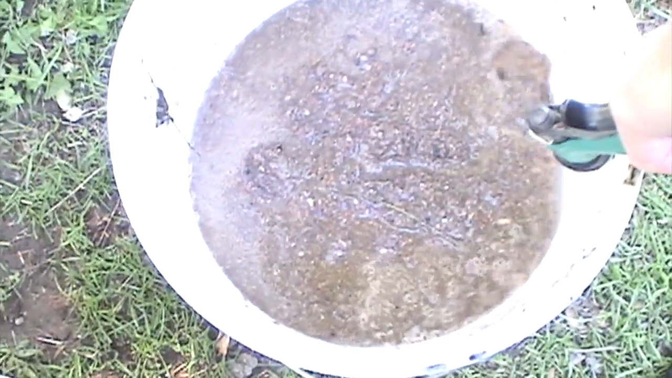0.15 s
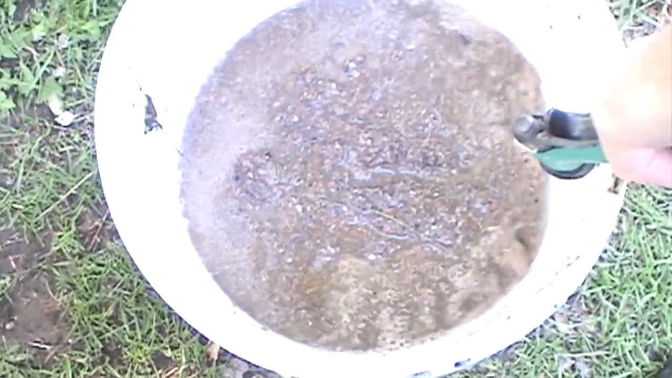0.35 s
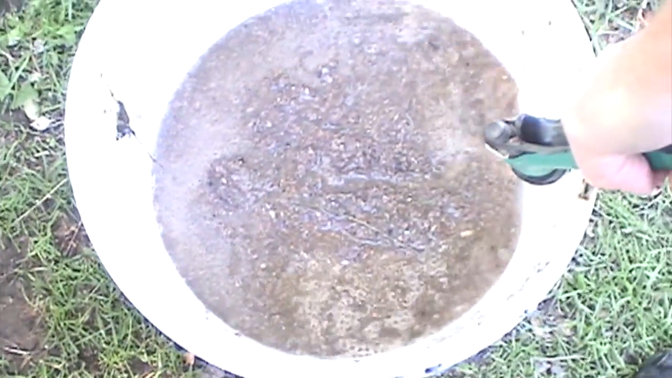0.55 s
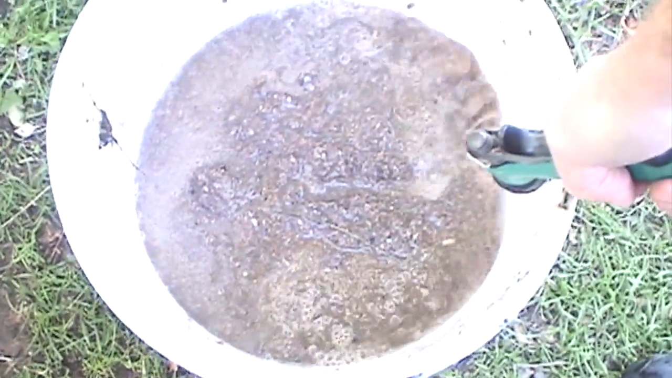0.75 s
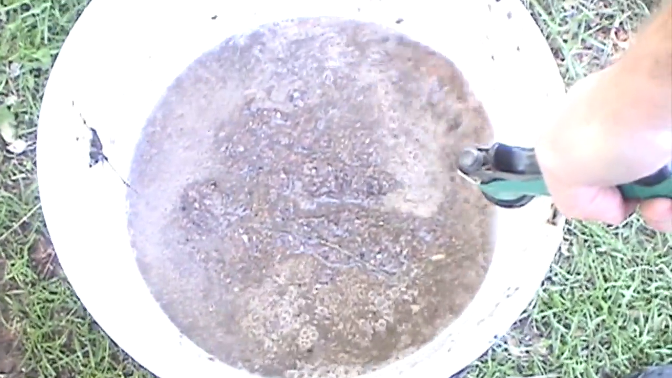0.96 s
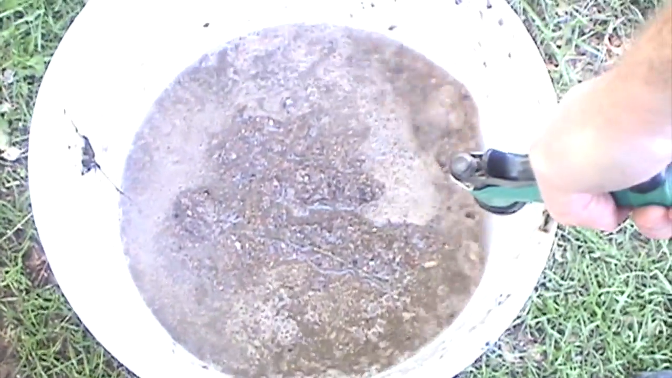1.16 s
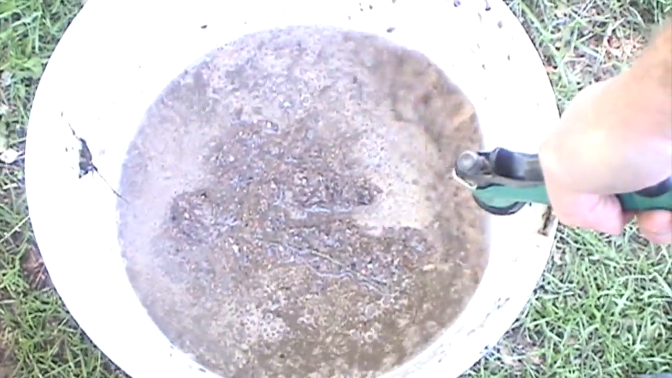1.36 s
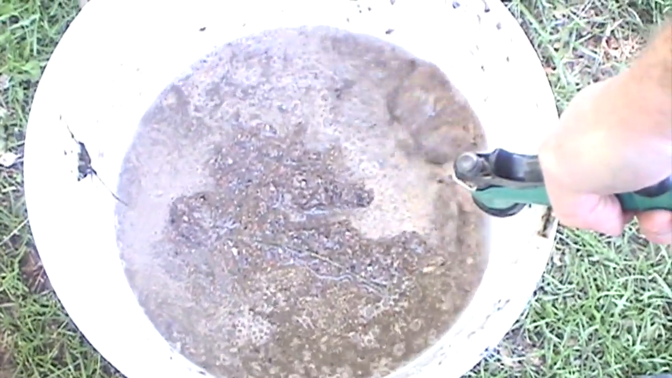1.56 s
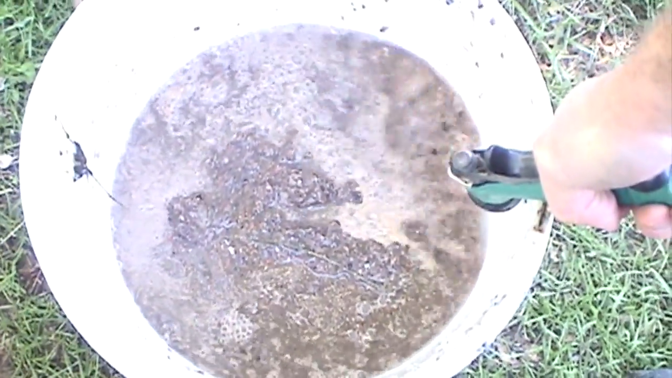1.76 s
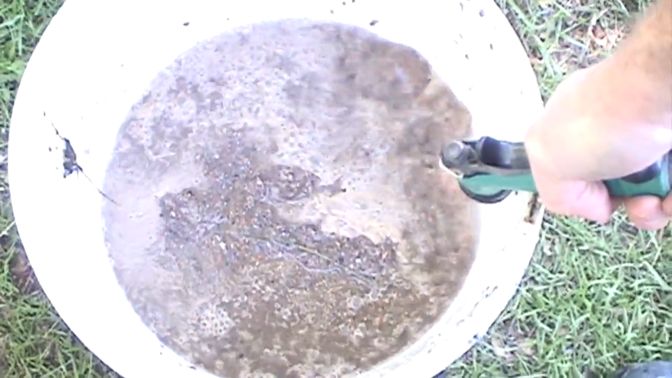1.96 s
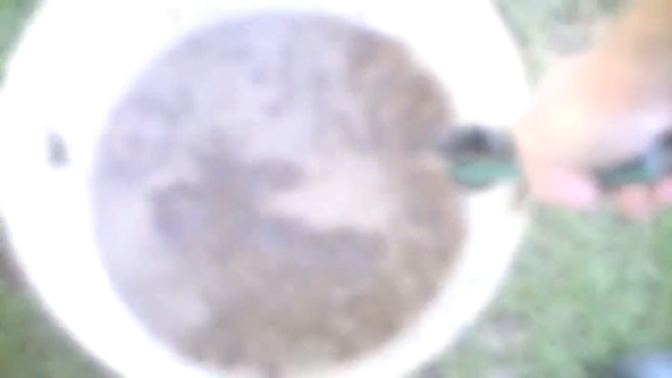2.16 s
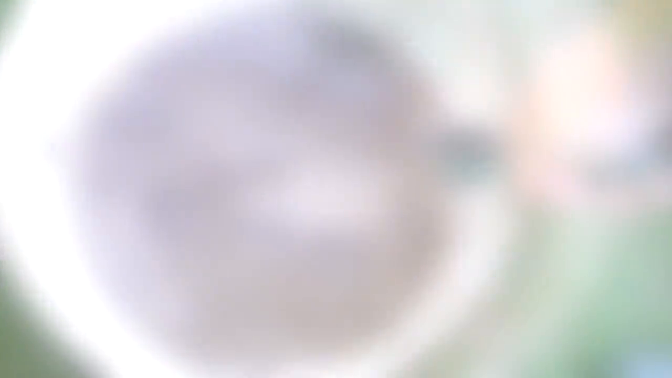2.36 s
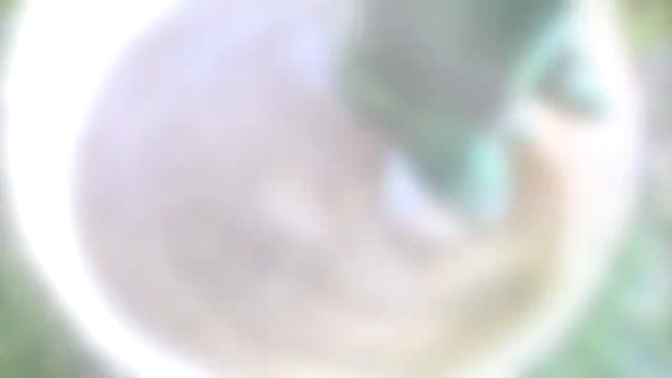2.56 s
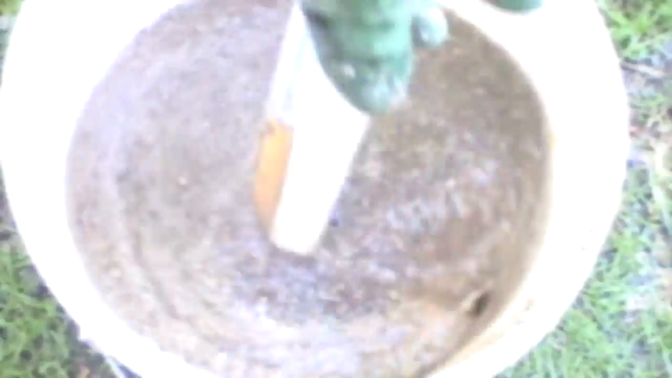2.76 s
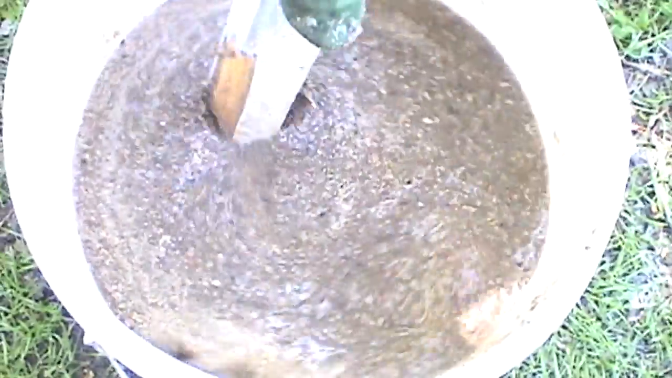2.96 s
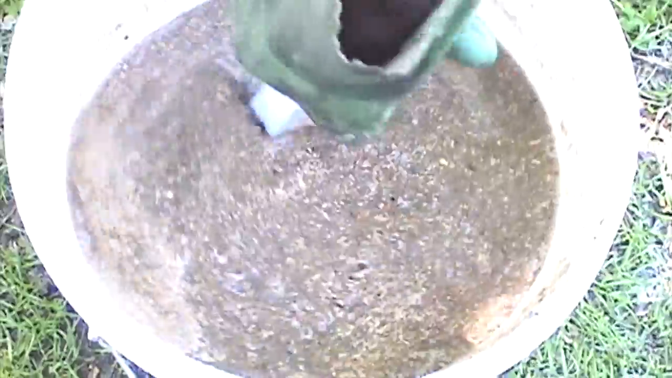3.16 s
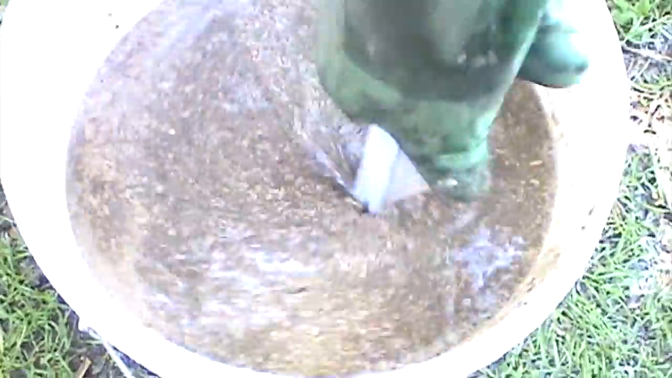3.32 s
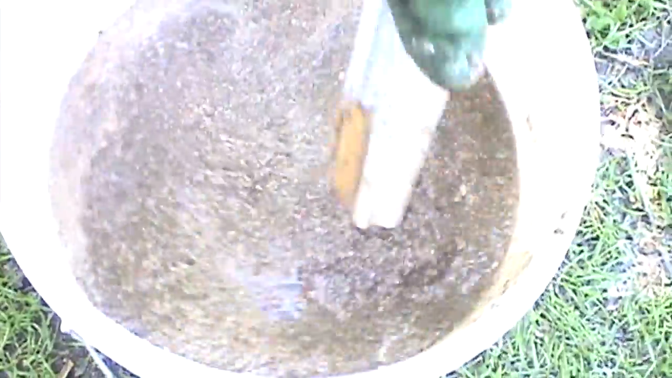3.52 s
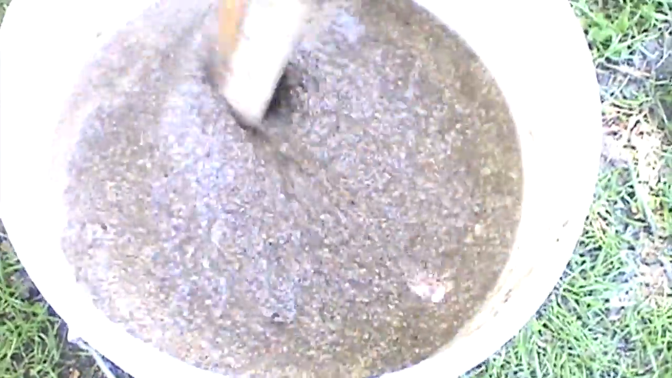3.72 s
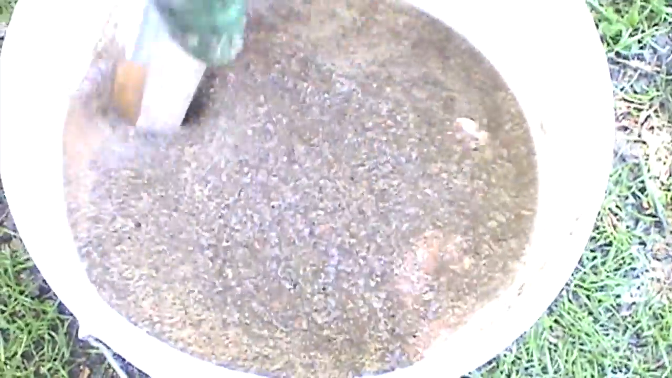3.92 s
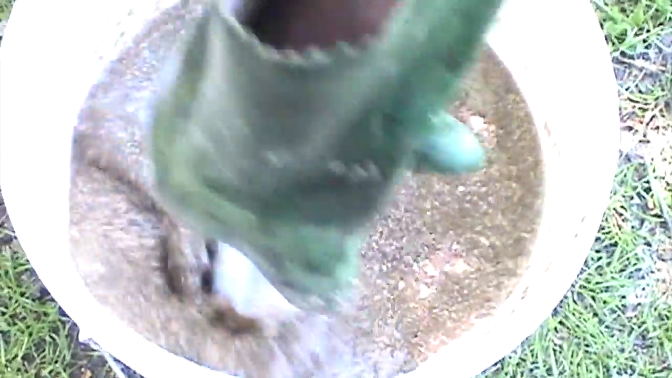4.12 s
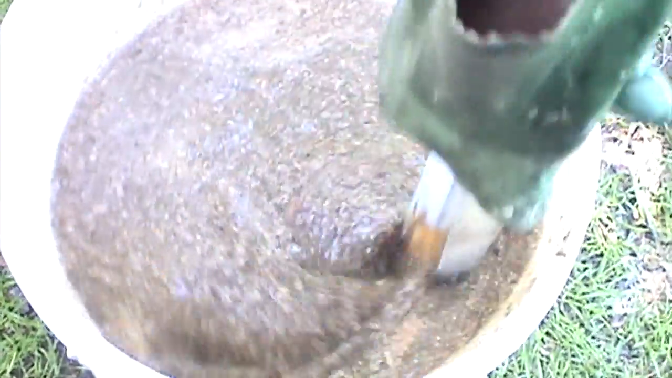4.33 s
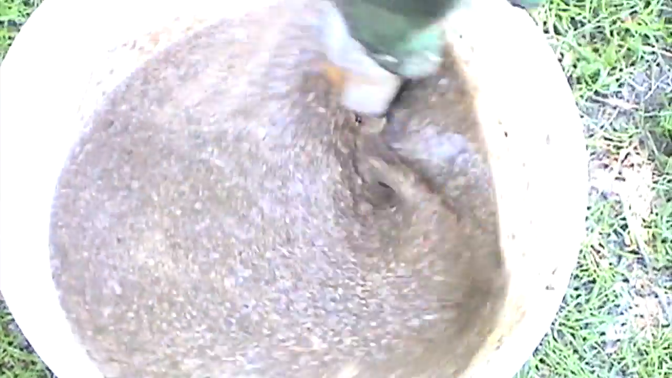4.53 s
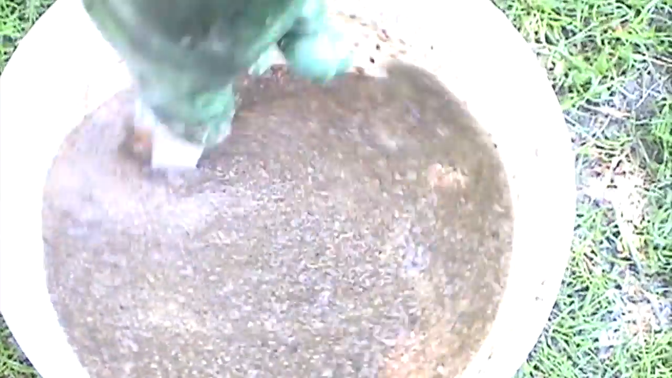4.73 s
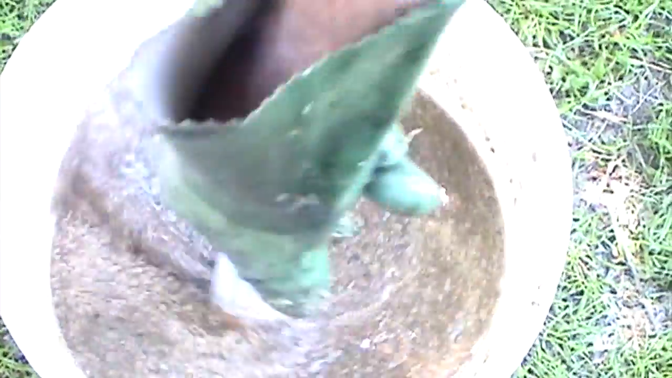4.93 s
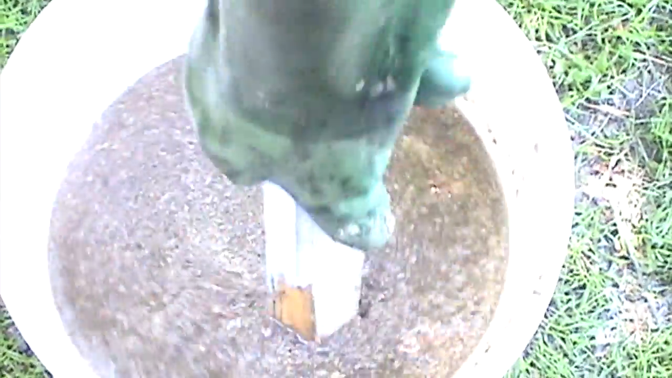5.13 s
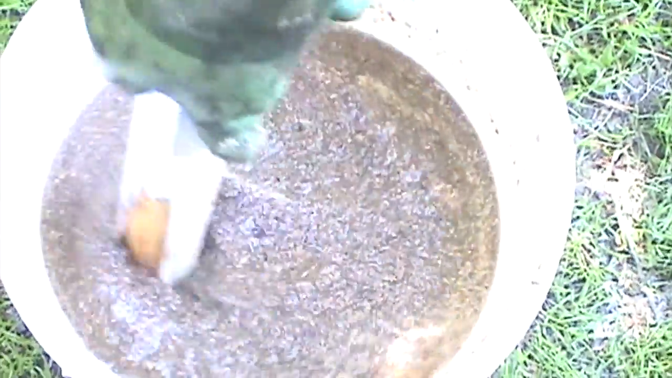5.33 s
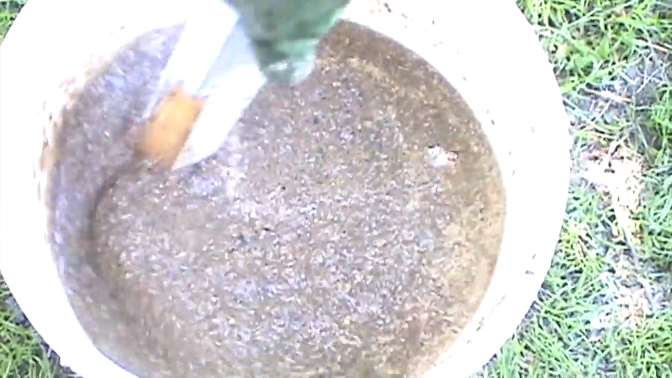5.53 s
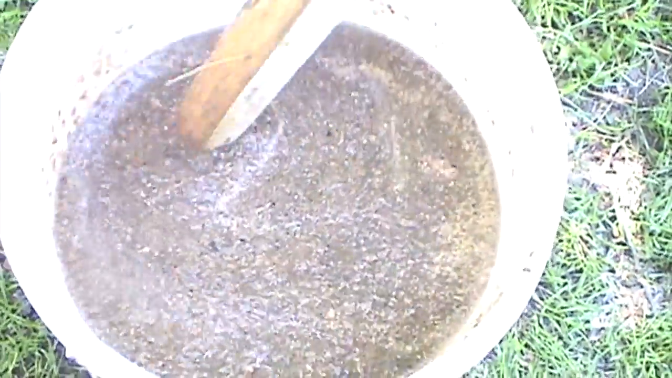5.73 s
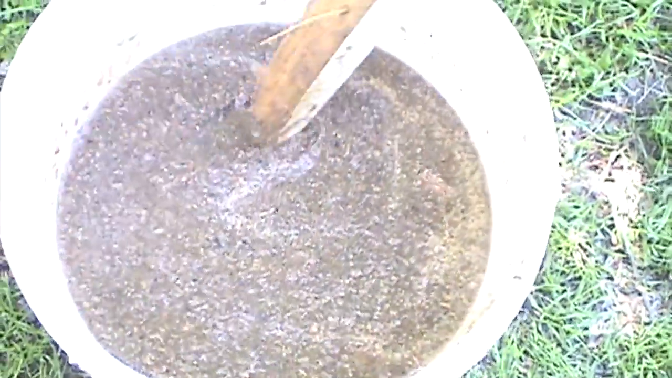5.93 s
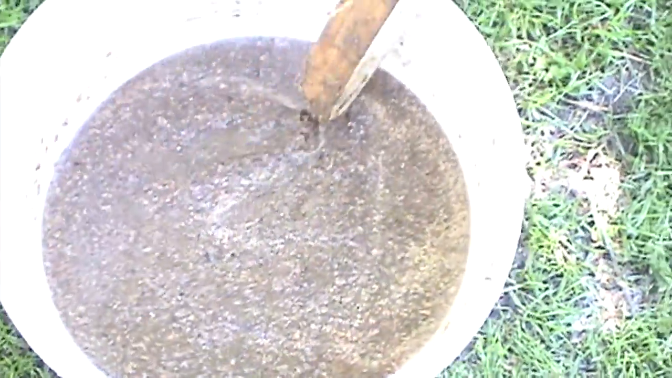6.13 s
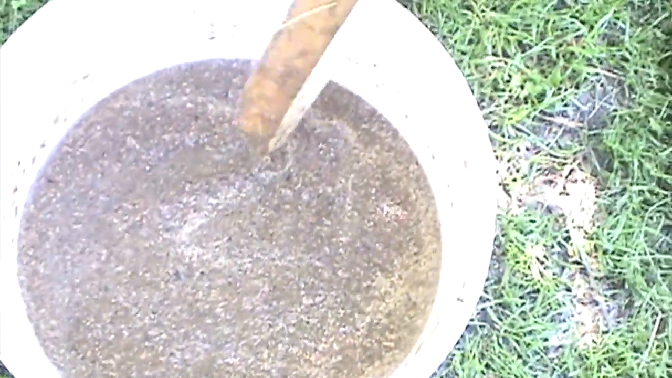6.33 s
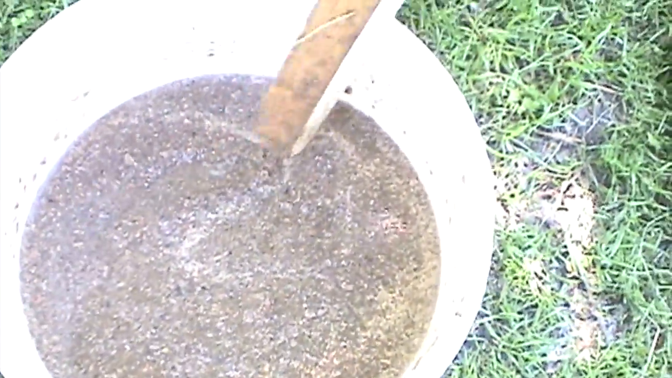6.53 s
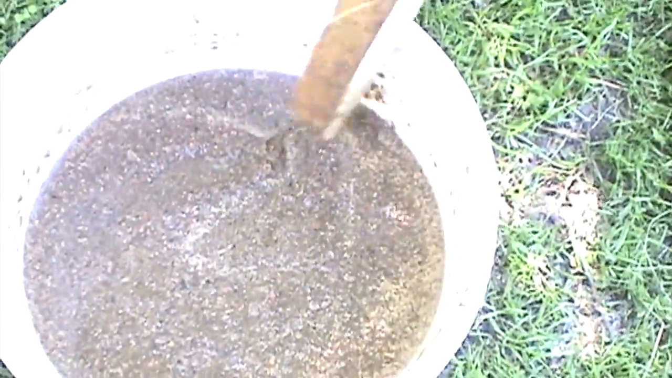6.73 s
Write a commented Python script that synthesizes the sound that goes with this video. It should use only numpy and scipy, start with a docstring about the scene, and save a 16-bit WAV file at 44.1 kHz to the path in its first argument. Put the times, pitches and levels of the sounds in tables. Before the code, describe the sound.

Water sprays and drums into a plastic bucket and stops; a stick stirs the wet mix and knocks three times on the wall.

```python
"""A hissing, drumming jet of water: a hose nozzle sprays into a plastic bucket of slurry on a lawn,
then is eased shut and dribbles out. Drops and bubbles make the hiss; the air in the bucket booms.
A wooden stick stirs the mix: it squelches, bumps the ringing wall and is finally knocked against it
three times. Small birds call some way off, and a faint electronic whine lies under everything."""
import sys
import numpy as np
from scipy import signal
from scipy.fft import rfft, irfft, next_fast_len
from scipy.io import wavfile

SR = 44100
rng = np.random.default_rng(int(sys.argv[2]) if len(sys.argv) > 2 else 0)


def to_wav(s):
    """Save 16-bit WAV."""
    ch = np.atleast_2d(s).T  # columns
    pcm = np.round(np.clip(ch, -1, 1) * 32767)  # PCM
    wavfile.write(sys.argv[1], SR, pcm.astype(np.int16))


N = 298998
TIME = np.arange(N) / SR


def spray():
    """The jet hisses and drums, dying away as the trigger is steadily let go."""
    closing_s, shut_s = 2.142, 2.946
    valve = np.interp(TIME, [closing_s, shut_s], [1, 0])
    return valve ** 1.295 * jet_hiss() + valve ** 1.24 * bucket_boom()


def jet_hiss():
    """Thousands of drops hit the slurry and echo off the bucket; gathering foam softens the hiss."""
    # tone of the drops: f/Hz, level/dB
    drop_colour = [(200, -43), (700, -16), (1100, -2.5), (1650, -4.5), (1900, -4.5), (2400, -1), (3400, -2),
                   (4300, 0), (5700, -1.5), (7000, -6.5), (8200, -2), (11300, -4), (13500, -12),
                   (15000, -16)]
    # reflections off the inside wall: delay/ms, gain
    wall_echoes = [(0.901, 0.28), (1.7, 0.095), (2.9, 0.12), (4.3, 0.22), (6.1, 0.14)]
    # upper resonances of the bucket and its air: f/Hz, width/Hz, level/dB
    hollow_modes = [(836, 94, 0.5), (1202, 224, 0), (1529, 59, 5.5), (1662, 26, 4.5), (2694, 360, -4),
                    (3784, 46, 4), (3860, 68, -2.5), (4450, 37, -11.5), (4900, 20, -29), (5040, 75, -0.5),
                    (5270, 30, -2), (5680, 43, 0), (7660, 270, -13)]
    impacts = grains(per_s=14000, spread_db=4.5) * from_db(1.36 * drift(per_s=45.79))
    drops = coloured(impacts, drop_colour) + fizz()
    # the nozzle wanders, so the echo paths change and the colour of the hiss shifts
    echoes = sum(gain * delayed(drops, ms + 0.049 * drift(per_s=2.41)) for ms, gain in wall_echoes)
    hollow = sum(from_db(db) * resonance(rng.standard_normal(N), hz, width)
                 for hz, width, db in hollow_modes)
    start_db, sag_db_per_s = -22, 0.67
    level = from_db(start_db - sag_db_per_s * TIME)
    return level * (rms_one(drops + echoes) + from_db(-2.5) * rms_one(hollow))


def fizz():
    """Tiny bubbles give way to a band of larger ones as the jet digs in."""
    dig_from_s, dig_to_s = 0.33, 0.81
    fine_hz, coarse_hz, spread_hz = 8960, 4207, 260
    depth = np.interp(TIME, [dig_from_s, dig_to_s], [0, 1])
    seethe = cut(grains(per_s=18000, spread_db=-0.5), spread_hz, "low")
    fine, coarse = (rms_one(seethe * np.sin(2 * np.pi * hz * TIME)) for hz in (fine_hz, coarse_hz))
    return (1 - depth) * from_db(-12) * fine + depth * from_db(-7.5) * coarse


def bucket_boom():
    """Heavier splashes drum on the air in the bucket, swelling and sinking as the jet wanders."""
    # low resonances of the air above the slurry: f/Hz, nominal width/Hz, level/dB
    cavity_modes = [(147, 19.4, -11.5), (249, 24, -10), (306, 48, -2.5), (354.4, 57, -1.5), (424.7, 38, -6),
                    (505, 71, -11.5)]
    boom = np.zeros(N)
    for hz, width, db in cavity_modes:
        splashes = grains(per_s=650, spread_db=4.0)
        # each resonance acts twice, which keeps the valleys between them dark
        boom += from_db(db) * resonance(resonance(splashes, hz, 1.4 * width), hz, 1.39 * width)
    surge = from_db(1.5 * drift(per_s=10.89))
    return from_db(-25.6) * rms_one(boom * surge)


def gulps():
    """Big air pockets collapse under the jet, each a low note only a few cycles long."""
    # collapsing pockets: t/s, level/dB, f/Hz
    pockets = [(0.1514, -6.5, 330), (0.295, -17, 356), (0.952, -14, 333), (2.181, -17.5, 339)]
    out, t = np.zeros(N), TIME[:SR // 20]
    rise_s = 0.0033
    envelope = (t / rise_s * np.exp(1 - t / rise_s)) ** 1.6
    for s, db, hz in pockets:
        add(out, s, from_db(db) * envelope * np.sin(2 * np.pi * hz * t))
    return out


def dribble():
    """The last water drains from the nozzle and patters on after the valve shuts."""
    # tone of the thin stream: f/Hz, level/dB
    stream_colour = [(100, -3), (380, 4), (700, -5), (1500, -10), (2200, -8), (4500, -9), (7500, -18.5),
                     (10000, -27), (16000, -33)]
    from_s, to_s, rise_db_per_s, fall_db_per_s = 2.88, 3.26, 100, 82
    fade_db = rise_db_per_s * np.maximum(from_s - TIME, 0) + fall_db_per_s * np.maximum(TIME - to_s, 0)
    return from_db(-45 - fade_db) * coloured(grains(per_s=4000, spread_db=2.0), stream_colour)


def knocks():
    """The stick strikes the wall and rattles on it; slurry cushions the deeper blows."""
    # modes of the plastic wall: f/Hz, level/dB, t60/s
    wall_modes = [(116, -14.5, 0.45), (157.2, -16, 0.21), (188, -12, 0.067), (267, -1, 0.064),
                  (363.3, -5, 0.12), (388, -2, 0.049), (431.6, -0.5, 0.038), (471, 4.5, 0.029),
                  (776, -9.5, 0.13), (860, -6.5, 0.11), (942, -9, 0.068), (1127, -15, 0.063),
                  (1248, -2.5, 0.032), (1343, -4.5, 0.025), (1490, -15, 0.065), (1555, -2, 0.041),
                  (1640, -2.5, 0.037), (1723, -13.5, 0.1), (2334, -19, .06), (2470, -25, 0.15),
                  (2626, -16, 0.05), (2960, -22, .04), (3710, -16.5, 0.07), (4370, -34, .04),
                  (5160, -25, .02), (5350, -26, .025)]
    grit_hz, grit_s, splash_hz, splash_s = 5050, 0.017, 9700, 0.03
    force, t, debris = np.zeros(N), TIME[:SR // 4], []
    slips = grains(per_s=1000, spread_db=1.0)
    for k, (s, db, bright_hz, bass_hz, rattle_db, rattle_s) in enumerate(contacts()):
        rattle = slips[k * len(t):(k + 1) * len(t)] * (t / rattle_s) * np.exp(-2 * t / rattle_s)
        contact = from_db(rattle_db) * rattle / np.sqrt(np.sum(rattle ** 2) + 1e-20)
        contact[0] += 1   # the impact itself
        add(force, s, from_db(db) * cut(cut(contact, bright_hz, "low"), bass_hz, "high"))
        # harder contacts crush more grit and shake off more droplets
        hard_db = db + 20 * np.log10(bright_hz / 2500)
        debris += [(s, hard_db - 19.5, grit_hz, grit_s), (s, hard_db - 30, splash_hz, splash_s)]
    # neighbouring pairs of modes swing in opposite directions
    wall = sum((-1) ** (k // 2) * from_db(db) * ring(force, hz, t60)
               for k, (hz, db, t60) in enumerate(wall_modes))
    return wall + pops(debris)


def contacts():
    """Every blow is a strike, a dull rebound of the wall and a skid as the stick falls back on it."""
    # blows: t/s, level/dB, brightness/Hz, bass cut/Hz, rattle/dB re the blow, rattle length/s,
    # rebound/dB re the blow, second touch delay/s, touch level/dB, skid length/s
    blows = [(3.435, -16.5, 323, 30, -6, 0.025, -3, .02, -30.5, .018),
             (3.885, -42, 990, 20, 4, 0.034, 15, .018, -39.5, .025),
             (4.142, -32.5, 2200, 40, -3, 0.0095, -8, .019, -36, .006),
             (4.229, -41.5, 1300, 40, -15, .035, -6, .012, -58, .01),
             (5.083, -28.5, 260, 30, -6, 0.04, -12, 0.027, -50, .02),
             (6.1707, -28, 2200, 90, -9, 0.0045, 3.5, .029, -31, 0.0086),
             (6.4689, -17, 2020, 175, -8.5, 0.054, 4, 0.039, -27.5, .009),
             (6.695, -14, 2560, 170, -0.5, 0.019, -1, 0.031, -20, 0.025)]
    rebound_after_s, dulling, touch_hz = 0.013, 0.18, 3250
    rows = []
    for s, db, bright_hz, bass_hz, rattle_db, rattle_s, rebound_db, after_s, touch_db, skid_s in blows:
        skid_db = -1.5 + 10 * np.log10(skid_s / 0.02)   # longer skids rattle more
        rows += [(s, db, bright_hz, bass_hz, rattle_db, rattle_s),
                 (s + rebound_after_s, db + rebound_db, dulling * bright_hz, bass_hz, -7, 0.012),
                 (s + after_s, touch_db, touch_hz, bass_hz, skid_db, skid_s)]
    return rows


def squelches():
    """Air pockets burst and throw fine droplets; sand crackles as the stirring builds and slackens."""
    # wet pops at the stick: t/s, level/dB, f/Hz, decay/s, spatter/dB
    bursts = [(4.044, -34, 5470, 0.005, -60), (4.147, -24, 1290, 0.0067, -36),
              (4.148, -33, 13100, 0.012, -47), (4.166, -25, 3540, 0.0081, -40),
              (4.216, -40, 8300, .004, -52), (4.231, -41.5, 850, 0.035, -47), (4.24, -38, 8500, .005, -55),
              (4.283, -29.5, 3110, 0.0013, -37.5), (4.394, -32, 3800, 0.0032, -41),
              (4.469, -40, 4200, .0047, -60), (4.572, -29.5, 6400, 0.0032, -37.5),
              (4.698, -34.5, 2350, 0.0052, -45), (5.456, -41.5, 4020, .012, -41)]
    lag_s, spatter_hz, spatter_s = 0.002, 8650, 0.0056
    from_s, hardest_s, to_s, fade_db_per_s = 2.75, 4.3, 6.9, 17
    pockets = [(s, db, hz, decay_s) for s, db, hz, decay_s, _ in bursts]
    spatter = [(s + lag_s, spatter_db, spatter_hz, spatter_s) for s, *_, spatter_db in bursts]
    sand = rms_one(cut(grains(per_s=260, spread_db=3), [3200, 7000], "band"))
    effort = from_db(-58 - fade_db_per_s * np.abs(TIME - hardest_s)) * (TIME > from_s) * (TIME < to_s)
    return pops(pockets + spatter) + effort * sand


def pops(rows):
    """Each row (t/s, level/dB, f/Hz, decay/s) is a short cluster of clicks that rings a small pocket."""
    # tone of the wet crackle: f/Hz, level/dB
    crackle_colour = [(300, 19), (1000, 18.5), (2000, 2), (3000, -4.5), (5500, -8), (9000, -27.5),
                      (15000, -31)]
    attack_s = 0.00031
    out, t = np.zeros(N), TIME[:SR // 9]
    crackle = coloured(grains(per_s=6000, spread_db=1), crackle_colour)
    for k, (s, db, hz, decay_s) in enumerate(rows):
        clicks = crackle[k * len(t):(k + 1) * len(t)]
        body = from_db(-6) * rms_one(cut(clicks, 2.8 * hz, "low"))
        pocket = from_db(-1.5) * rms_one(resonance(clicks, hz, hz / 8))
        envelope = np.exp(-t / decay_s) * (1 - np.exp(-t / attack_s))
        add(out, s, from_db(db) * (body + pocket) * envelope)
    return out


def birds():
    """Level whistles, each with a higher arching slur, then falling chirps, blurred by garden echoes."""
    # song phrases: t/s, whistle f/Hz, whistle level/dB, slur level/dB
    phrases = [(2.788, 4560, -45, -42.5), (3.003, 4593, -41.5, -43.5), (3.218, 4664, -46, -52)]
    # short chirps: t/s, level/dB, f/Hz
    chirps = [(3.432, -50, 4140), (5.71, -51.5, 2940), (5.869, -55.5, 2970), (6.045, -53, 2900),
              (6.30, -52, 1595)]
    whistle_s, slur_s, chirp_s, echo_decay_s = 0.125, 0.068, 0.0454, 0.048
    base_hz, arch_hz, top_s, half_width_s = 5250, 682, 0.022, 0.014
    slur_hz = base_hz + arch_hz * np.exp(-((TIME[TIME < slur_s] - top_s) / half_width_s) ** 2)
    song = np.zeros(N)
    for s, hz, whistle_db, slur_db in phrases:
        add(song, s, from_db(whistle_db) * bird_note(np.full(round(whistle_s * SR), hz), rasp=0.005))
        add(song, s + whistle_s, from_db(slur_db) * bird_note(slur_hz, rasp=0.022))
    glide = 1 + 0.147 * np.linspace(0.5, -0.5, round(chirp_s * SR))
    for s, db, hz in chirps:
        add(song, s, from_db(db) * bird_note(hz * glide, rasp=0.053))
    t = TIME[:SR // 4]
    echoes = rng.standard_normal(len(t)) * np.exp(-t / echo_decay_s)
    return song + from_db(-1.5) * signal.fftconvolve(song, echoes / np.linalg.norm(echoes))[:N]


def bird_note(hz, rasp):
    """A whistle swells and fades along a pitch curve; rasp is its jitter as a share of the pitch."""
    pitch = hz * (1 + rasp * drift(per_s=450)[:len(hz)])
    swell = np.sin(np.pi * np.linspace(0, 1, len(hz)) ** 0.86)
    waver = from_db(2.5 * drift(per_s=45)[:len(hz)])
    return swell * waver * np.sin(2 * np.pi * np.cumsum(pitch) / SR)


def whine():
    """The high overtones of an electronic buzz, and a thin pulsing tone at the top of hearing."""
    # overtones of the buzz: harmonic number, relative level/dB
    overtones = [(13, -65.5), (14, -67), (15, -62), (16, -58), (17, -63), (18, -68), (19, -65), (20, -70),
                 (21, -88), (22, -72), (33, -71), (34, -77), (35, -77), (36, -76), (37, -78)]
    buzz_hz, thin_hz, pulse_hz = 299.7, 15735, 13
    buzz = sum(np.sqrt(2) * from_db(db) * np.sin(2 * np.pi * harmonic * buzz_hz * TIME)
               for harmonic, db in overtones)
    pulse = 1 + 0.5 * np.sin(2 * np.pi * pulse_hz * TIME)
    thin = rms_one(pulse * np.sin(2 * np.pi * thin_hz * TIME))
    return from_db(-2.4) * buzz + from_db(-69) * thin


def outdoor_air():
    """A quiet, bass-heavy bed of noise whose level flickers slightly."""
    # tone of the open air: f/Hz, level/dB
    air_colour = [(15, -24), (25, -1), (99, -5.5), (198, -15.5), (233, -9.5), (267, -15), (457, -12.5),
                  (495, -14.5), (919, -16), (1710, -21.5), (2920, -24.5), (3720, -25.5), (4620, -24.5),
                  (8580, -30.5), (15500, -34)]
    return from_db(-48.5) * coloured(rng.standard_normal(N), air_colour) * from_db(0.5 * drift(per_s=13))


def from_db(db):
    return 10 ** (np.asarray(db) / 20)


def rms_one(x):
    return x / np.sqrt(np.mean(x ** 2) + 1e-20)


def coloured(x, points):
    """Shape a sound with an EQ curve of (f/Hz, level/dB) points; rms 1."""
    hz, db = np.transpose(points)
    size = next_fast_len(N)
    grid = np.maximum(np.fft.rfftfreq(size, 1 / SR), 1)
    gain = from_db(np.interp(np.log(grid), np.log(hz), db))
    return rms_one(irfft(rfft(x, size) * gain, size)[:N])


def drift(per_s):
    """A random wander that glides between values of spread 1."""
    knots = rng.standard_normal(4000)
    return np.interp(TIME * per_s, np.arange(len(knots)), knots)


def grains(per_s, spread_db):
    """Random clicks of uneven size; rms 1."""
    clicks = (rng.random(N) < per_s / SR) * rng.choice([-1, 1], N)
    return rms_one(clicks * from_db(spread_db * np.clip(rng.standard_normal(N), -2, 2)))


def resonance(x, hz, width):
    """Two-pole band-pass with gain 1 at its peak."""
    r = np.exp(-np.pi * width / SR)
    feedback = [1, -2 * r * np.cos(2 * np.pi * hz / SR), r * r]
    return signal.lfilter(np.array([1, 0, -1]) * (1 - r * r) / 2, feedback, x + 1e-18)


def ring(clicks, hz, t60):
    """A unit click sets a sine of height 1 ringing."""
    r, w = from_db(-60 / (t60 * SR)), 2 * np.pi * hz / SR
    return signal.lfilter([0, np.sin(w)], [1, -2 * r * np.cos(w), r * r], clicks + 1e-18)


def cut(x, hz, kind):
    """Second-order low-, high- or band-pass."""
    sos = signal.butter(2, np.minimum(hz, SR / 2 - 1), kind, fs=SR, output="sos")
    return signal.sosfilt(sos, x + 1e-18)


def delayed(x, ms):
    return np.interp(TIME - ms / 1000, TIME, x)


def add(out, s, x):
    i = round(s * SR)
    out[i:i + len(x)] += x[:N - i]


def scene():
    """Hose, stick and garden, all dead centre."""
    mono = spray() + gulps() + dribble() + knocks() + squelches() + birds() + whine() + outdoor_air()
    return np.array([mono, mono])


def record(dry):
    """A steep low-pass takes off the very top."""
    cutoff_hz = 15850
    return signal.sosfilt(signal.ellip(12, 0.1, 90, cutoff_hz, fs=SR, output="sos"), dry)


dry = scene()
out = record(dry)
to_wav(out)
```